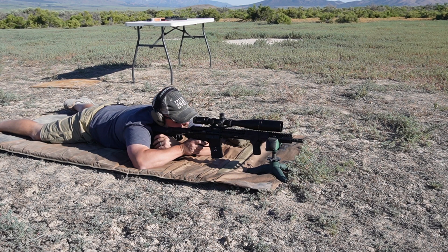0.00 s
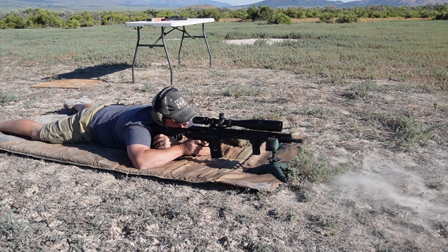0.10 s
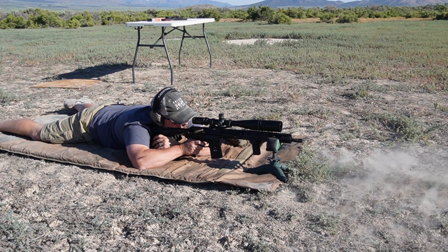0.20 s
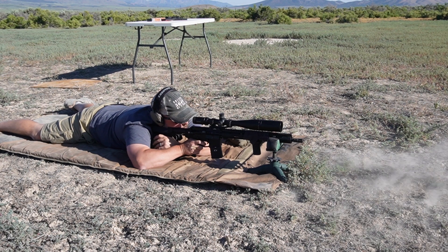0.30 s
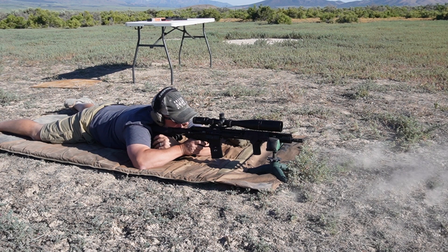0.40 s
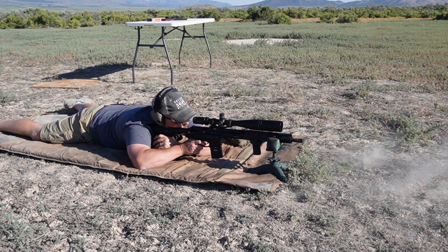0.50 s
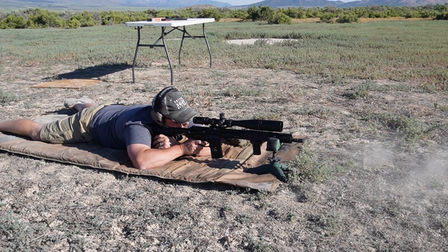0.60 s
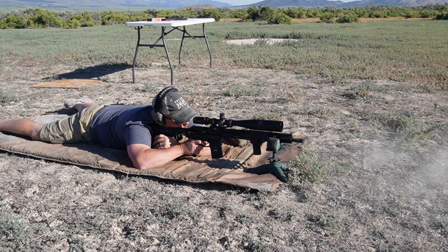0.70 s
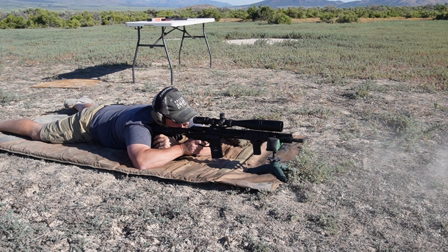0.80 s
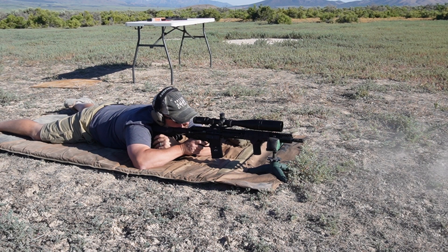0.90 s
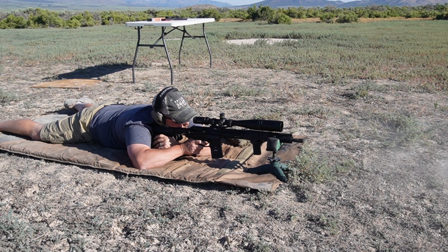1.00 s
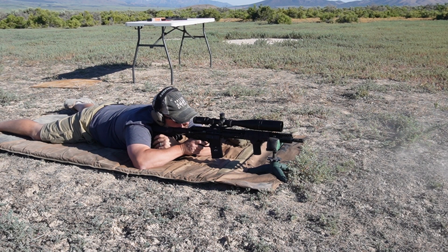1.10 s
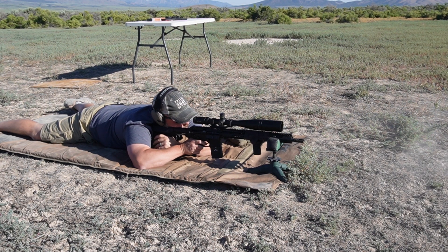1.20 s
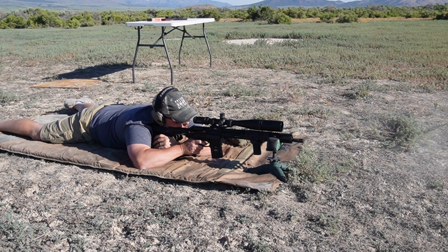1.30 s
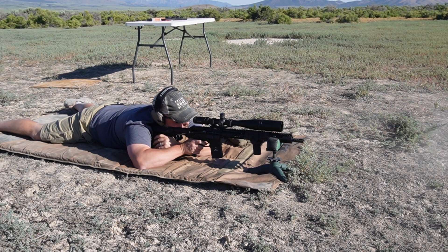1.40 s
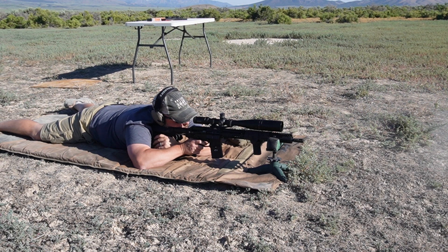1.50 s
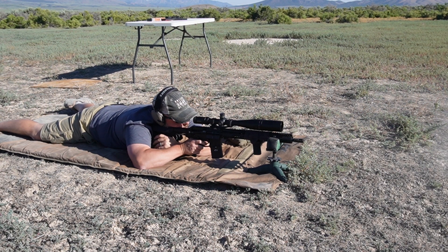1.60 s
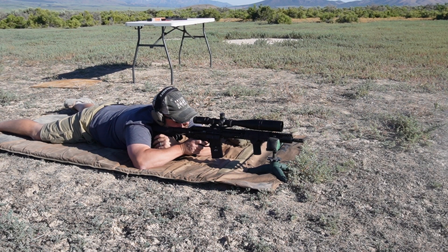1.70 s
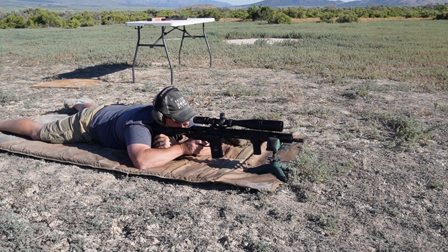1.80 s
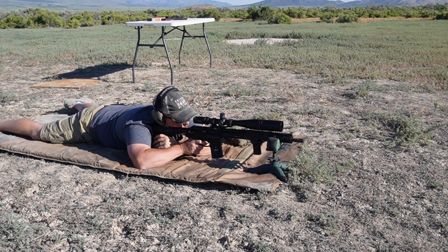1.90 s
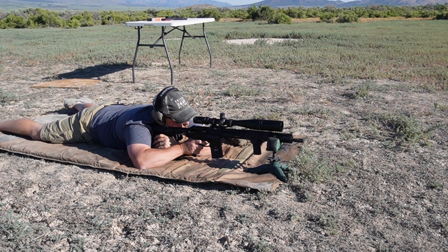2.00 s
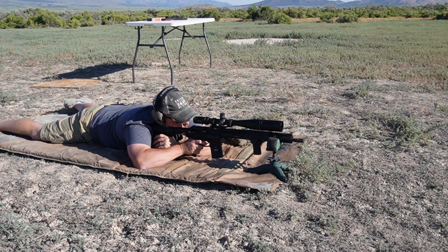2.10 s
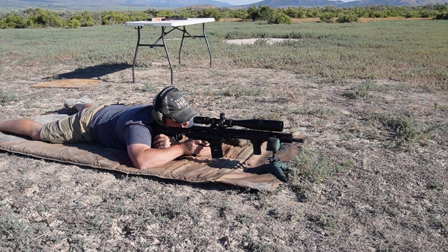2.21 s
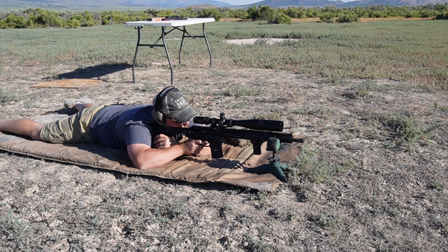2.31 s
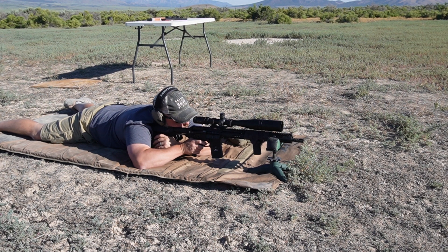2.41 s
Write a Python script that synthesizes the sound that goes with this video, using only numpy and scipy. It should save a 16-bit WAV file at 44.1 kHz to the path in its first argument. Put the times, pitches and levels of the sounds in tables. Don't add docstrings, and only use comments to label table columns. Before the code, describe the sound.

A single close rifle shot cracks and clips outdoors, then a brass case tinkles and metal clacks.

```python
import sys
import numpy as np
from scipy import signal
from scipy.fft import rfft, irfft, next_fast_len
from scipy.io import wavfile
from scipy.ndimage import map_coordinates

SR = 44100
rng = np.random.default_rng(int(sys.argv[2]) if len(sys.argv) > 2 else 0)


def transcribe(signal):
    frames = np.atleast_2d(signal).T
    limited = np.clip(frames, -1, 1)
    pcm = np.round(limited * 32767).astype(np.int16)
    wavfile.write(sys.argv[1], SR, pcm)


def ratio_of_db(decibels):
    return 10 ** (np.asarray(decibels, float) / 20)


N = 110250

HAMMER_S, BLAST_S, RESET_S = .2122, .2172, 1.0042

# t/s, f/Hz, level/dB of multiples 1, 2 and 4
ENGINE = [(0, 179.4, -59, -63, -79), (.5, 180, -61.5, -67, -73.5), (.64, 180.4, -59, -55, -60.5),
          (.99, 181.9, -66.5, -67.5, -67), (1.1, 181.1, -62.5, -83.5, -79), (1.8, 182.6, -60.5, -75, -89),
          (1.88, 184.5, -58.5, -57.5, -84), (2.2, 185.9, -58, -64.5, -92), (2.5, 182.6, -62.5, -65, -84.5)]
# multiple of 250 Hz, level/dB
BUZZ = [(1, -70), (2, -74), (3, -75), (4, -74), (5, -74.5), (6, -75.5), (7, -75.5), (8, -78), (9, -79.5),
        (10, -83.5), (11, -84)]
# f/Hz, level/dB
AIR_TONE = [(12, -40), (40, -5), (130, -10.5), (420, -12.5), (900, -23.5), (1900, -27), (2500, -24.5),
            (15700, -28)]
# t/s, level/dB, f/Hz
TICKS = [(.162, -37, 1670), (0.5977, -36, 5470), (0.603, -45.5, 4500), (0.7464, -40, 5600),
         (0.753, -46.5, 5970), (0.765, -55, 380), (.845, -45.5, 4040), (0.883, -49, 6000),
         (1.105, -52.5, 3950), (1.168, -35.5, 4530), (1.168, -40.5, 700), (1.305, -47, 3490),
         (1.33, -52, 2000), (1.42, -50, 3000), (1.465, -45.5, 3513), (1.7048, -46.5, 4000)]
# t/s, level/dB, t60/s
BOLT = [
    (HAMMER_S, 3, .007),
    (.2524, -13, .012),
    (.2628, -7, .015),
    (.2745, -2.5, .024),
    (.2860, -11, .02),
]
# f/Hz, level/dB
BOLT_TONE = [(300, -30.5), (700, -10), (2000, -5), (3000, -3.5), (4000, 1), (7500, -7.5), (10200, -9.5),
             (15700, -24.5)]
# t/s, level/dB
BRUSH = [(.222, -23.5), (.27, -23.5), (.30, -17), (.335, -13), (.40, -20), (.455, -27.5), (.49, -42.5),
         (.52, -61), (.56, -89)]
# f/Hz, width/Hz, level/dB
BRUSH_BANDS = [(1782, 420, -8.5), (3820, 510, -7.5), (4440, 1100, -3.5), (5670, 700, -12.5),
               (7110, 1400, -2.5), (8660, 530, -11), (10500, 620, -9)]
# f/Hz, level/dB
BRUSH_TONE = [(500, -31), (1200, -7.5), (2700, -13), (6000, -4.5), (12000, -19.5), (15700, -31.5)]
# t/s, level/dB
FAR_BRUSH = [(.45, -49.5), (.56, -59.5), (.72, -60), (.84, -62.5), (1.0, -75), (1.4, -69), (1.8, -74.5),
             (2.5, -93)]
# f/Hz, level/dB
FAR_BRUSH_TONE = [(900, -21.5), (1400, -10.5), (1850, -1.5), (2600, -5), (3600, -3), (4900, -2), (6200, -8),
                  (12000, -29)]
# t/s, level/dB
BOOM = [(.222, -16), (.27, -16.5), (.30, -23.5), (.40, -30.5), (.48, -42), (.55, -57.5), (.65, -66.5)]
# f/Hz, level/dB
BOOM_TONE = [(50, -44), (160, -15), (280, -11), (370, 1), (620, -5.5), (1100, -14), (1750, -9.5),
             (3200, -34)]
# t/s, level/dB
HILLS = [(.45, -45), (.6, -53), (.78, -55), (.95, -58.5), (1.2, -63), (1.42, -57), (1.7, -58.5), (1.9, -67),
         (2.5, -95)]
# f/Hz, level/dB
HILLS_TONE = [(100, -25), (230, -3), (330, 1), (550, -5), (900, -12.5), (1600, -25.5), (3000, -40.5)]
# t/s, level/dB, f/Hz
THUMPS = [
    (0.2328, -6, 450),
    (.2376, -7, 420),
    (0.2420, -4, 500),
    (.2530, -9, 560),
    (0.2590, -8, 550),
    (0.2674, -1, 470),
    (0.2883, -13, 460),
]
# t/s, knock level/dB, low ring level/dB, high ring level/dB, spin/(1/s)
LANDINGS = [
    (0.6154, -25, -35, -37.5, 23.5),
    (0.7899, -39.5, -46.5, -55, 20),
    (0.8062, -35, -43, -56, 1.2),
]
# f/Hz, t60/s, throbs per turn, first swell/s
BRASS = [
    (10965, 0.24, 1.4, .012),
    (13010, 0.55, 1, 0),
    (14860, .3, 1.5, 0.004),
]
# delay/s, level/dB
RESET_GAPS = [
    (-.0014, -24),
    (.0002, 2),
    (.0011, -3),
    (.0019, 0),
    (.003, -9),
    (.0045, -16),
]
# f/Hz, level/dB
RESET_TONE = [(200, -20), (750, -5.5), (1000, -12), (1440, 1), (2200, -6.5), (2900, 1), (10500, -14.5),
              (15700, -31)]
# f/Hz, level/dB, t60/s
RECEIVER = [(380, -2.5, 0.033), (611.8, -4.5, .05), (788, -5.5, 0.077), (4500, -11.5, 0.018),
            (1306, -2.5, 0.017), (1580, -6.5, 0.022), (1835, -1.5, 0.05), (2530, -15, 0.025),
            (2920, 0.5, 0.013), (3607, -24.5, 0.1), (5220, -28, 0.094), (5500, -29.5, 0.04)]
# f/Hz, level/dB, t60/s
BARREL = [(520, -30, 0.6), (840, -35, 0.75), (1950, -33, 0.28), (1400, -40, 0.3563)]

BLAST_DB, BLAST_T60 = 24.5, .03
START_HZ, END_HZ, SINK_S = 1780, 700, .0086
MUZZLE_HZ, MUZZLE_DB, MUZZLE_S = 5895, 8, .0013
WANDER, GRIT_DB = .22, -5.5
CEILING_DB, SAG_DB_PER_S, COUPLING_HZ = -2, 599.5, 600
AIR_LOSS_DB, LOSS_FROM_S, LOSS_FOR_S = 8, .36, .15
RESET_DB = -6
MIC_LOW_HZ, SHOT_LOW_HZ = 230, 112


def unit(x):
    return x / np.sqrt(np.mean(x ** 2) + 1e-20)


def since(s):
    t = np.arange(N) / SR - s
    return np.maximum(t, 0), t >= 0


def curves(rows):
    s, *columns = np.transpose(rows)
    return [np.interp(np.arange(N) / SR, s, column) for column in columns]


def wobble(rate):
    knots = rng.standard_normal(int(N * rate / SR) + 4)
    return map_coordinates(knots, [np.arange(N) * rate / SR])


def filtered(x, response):
    m = next_fast_len(N + SR // 2)
    return irfft(rfft(x, m) * response(np.fft.rfftfreq(m, 1 / SR)), m)[..., :N]


def noise(tone):
    f, db = np.transpose(tone)
    colour = lambda hz: ratio_of_db(np.interp(np.log(hz + 1), np.log(f + 1), db))
    return unit(filtered(rng.standard_normal(N), colour))


def band(hz, centre, width):
    return 1j * hz * width / (centre ** 2 - hz ** 2 + 1j * hz * width)


def burst(s, db, t60, colour, attack=.0007):
    t, on = since(s)
    return on * ratio_of_db(db - 60 * t / t60) * (1 - np.exp(-t / attack)) * colour


def ring(s, db, modes, spread_db):
    t, on = since(s)
    draw = rng.standard_normal((len(modes), 2))
    out = 0
    for (hz, level, t60), (luck, phase) in zip(modes, draw):
        decay = ratio_of_db(db + level + spread_db * luck - 60 * t / t60)
        out = out + decay * np.sin(2 * np.pi * hz * t + 2 * phase)
    return on * out * (1 - np.exp(-t / .0003))


def background():
    hz, *levels = curves(ENGINE)
    turn = 2 * np.pi * np.cumsum(hz * (1 + .001 * wobble(6))) / SR
    drone = sum(ratio_of_db(db + .6 * wobble(12)) * np.sin(2 ** k * turn) for k, db in enumerate(levels))
    buzz = sum(ratio_of_db(db) * np.sin(2 * np.pi * k * 250 * since(0)[0]) for k, db in BUZZ)
    air = ratio_of_db(-61.5 + .48 * wobble(5.5)) * noise(AIR_TONE)
    return drone + buzz + air


def ticks():
    white = rng.standard_normal(N)
    out = 0
    for s, db, hz in TICKS:
        click = unit(filtered(white, lambda f: band(f, hz, 1.5 * hz) ** 2))
        out = out + burst(s, db, .009, click)
    return out


def action():
    steel = noise(BOLT_TONE) * ratio_of_db(2 * wobble(1200))
    return sum(burst(s, db, t60, steel, attack=.0012) for s, db, t60 in BOLT)


def blast():
    t, on = since(BLAST_S)
    hz = END_HZ + (START_HZ - END_HZ) / (1 + (t / SINK_S) ** 4)
    hz = hz * np.exp(WANDER * wobble(1100))
    grit = ratio_of_db(GRIT_DB) / (1 + (t / SINK_S) ** 6) * rng.standard_normal(N)
    swing = np.sin(2 * np.pi * np.cumsum(on * hz) / SR) + grit
    shrill = ratio_of_db(MUZZLE_DB) * np.exp(-(t / MUZZLE_S) ** 3) * np.sin(2 * np.pi * MUZZLE_HZ * t)
    loud = on * ratio_of_db(BLAST_DB - 60 * t / BLAST_T60 + 1.4 * wobble(360)) * (swing + shrill)
    flat = ratio_of_db(CEILING_DB - SAG_DB_PER_S * t) * np.tanh(loud)
    return filtered(flat, lambda f: 1j * f / (COUPLING_HZ + 1j * f) / (1 + 1j * f / 12000))


def echoes():
    fade_in = np.clip(since(BLAST_S)[0] / .0088, 0, 1)
    clicks = unit(ratio_of_db(4 * wobble(900)) * rng.standard_normal(N))
    late = np.minimum(since(LOSS_FROM_S)[0], LOSS_FOR_S)
    bands = np.array([filtered(clicks, lambda f: ratio_of_db(db) * band(f, c, w) ** 2) for c, w, db in BRUSH_BANDS])
    bands = unit(bands) / np.sqrt(len(BRUSH_BANDS))
    comb = 0
    for (centre, width, db), one in zip(BRUSH_BANDS, bands):
        air_loss = -AIR_LOSS_DB * late * (centre - 5500) / 1000
        comb = comb + ratio_of_db(air_loss + 1.4 * wobble(80)) * one
    brush = ratio_of_db(curves(BRUSH)[0]) * (comb + ratio_of_db(-7) * noise(BRUSH_TONE))
    far = ratio_of_db(curves(FAR_BRUSH)[0] + 1.2 * wobble(130)) * noise(FAR_BRUSH_TONE)
    boom = ratio_of_db(curves(BOOM)[0] + 2.5 * wobble(60)) * noise(BOOM_TONE)
    hills = ratio_of_db(curves(HILLS)[0] + 1.6 * wobble(33)) * noise(HILLS_TONE)
    return fade_in * (brush + far + boom + hills)


def thumps():
    out = 0
    for s, db, hz in THUMPS:
        turn = hz * (np.arange(N) / SR - s)
        swell = np.exp(-(turn - .5) ** 2 / .33)
        triangle = 2 / np.pi * np.arcsin(.97 * np.sin(2 * np.pi * turn + 1.6))
        out = out + ratio_of_db(db) * swell * triangle
    return out


def case():
    stone = noise([(300, -14), (850, -0.5), (1600, 1.5), (2400, -8.5), (3400, 0), (4800, -6.5),
                   (6100, -5.5), (15000, -12)])
    ends = [row[0] for row in LANDINGS[1:]] + [N / SR]
    out = 0
    for (s, knock_db, low_db, high_db, spin), end in zip(LANDINGS, ends):
        out = out + burst(s, knock_db, .015, stone)
        choke = np.exp(-since(end)[0] / .0023)
        for (hz, t60, throbs, swell), db in zip(BRASS, (low_db, high_db, low_db - 19.5)):
            tumble = .0514 + np.cos(np.pi * spin * throbs * (since(s)[0] - swell))
            throb = tumble * ratio_of_db(2 * wobble(52))
            out = out + throb * ring(s, db, [(hz, 0, t60)], spread_db=.83) * choke
    return out


def trigger():
    snap = noise(RESET_TONE)
    cracks = sum(burst(RESET_S + s, RESET_DB + 1.5 + db, .0045, snap, attack=.00012) for s, db in RESET_GAPS)
    hum = sum(ratio_of_db(3 * wobble(70)) * ring(RESET_S, RESET_DB - 11, [mode], spread_db=.3) for mode in BARREL)
    body = sum(ratio_of_db(3 * wobble(150)) * ring(RESET_S, RESET_DB - 10, [mode], spread_db=.5) for mode in RECEIVER)
    noisy_tail = burst(RESET_S + .004, RESET_DB - 28.5, .071, snap)
    return cracks + body + noisy_tail + hum


def scene():
    metal = action() + case() + ticks() + trigger()
    metal = filtered(metal, lambda f: (1j * f / (MIC_LOW_HZ + 1j * f)) ** 3)
    shot = filtered(blast() + thumps(), lambda f: (1j * f / (SHOT_LOW_HZ + 1j * f)) ** 2)
    return (shot + metal + echoes() + background())[None]


def roll_off(x):
    return signal.sosfilt(signal.butter(12, 15820, fs=SR, output="sos"), x)


def record(dry):
    held = dry / (1 + np.abs(dry / .98) ** 6) ** (1 / 6)
    mix = filtered(held, lambda hz: hz < 15800)
    return roll_off(mix)


dry = scene()
out = record(dry)
transcribe(out)
```